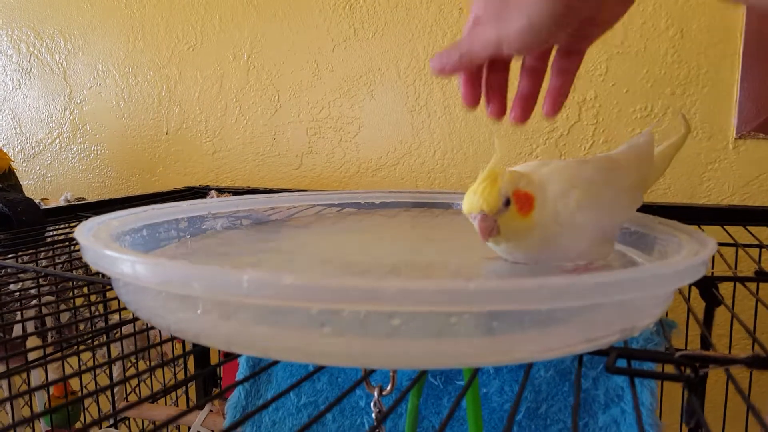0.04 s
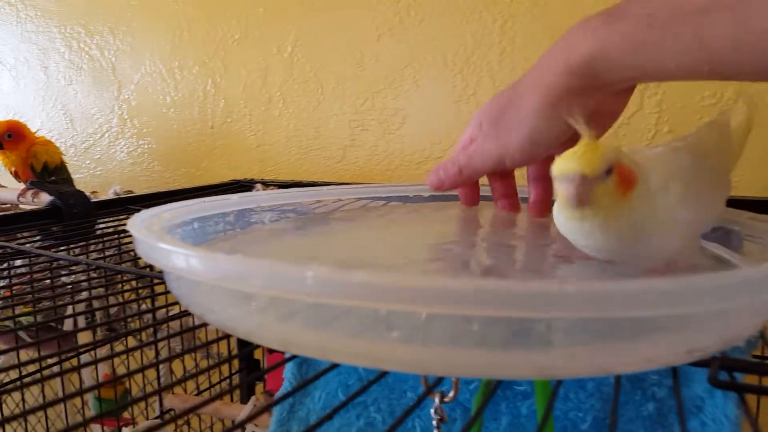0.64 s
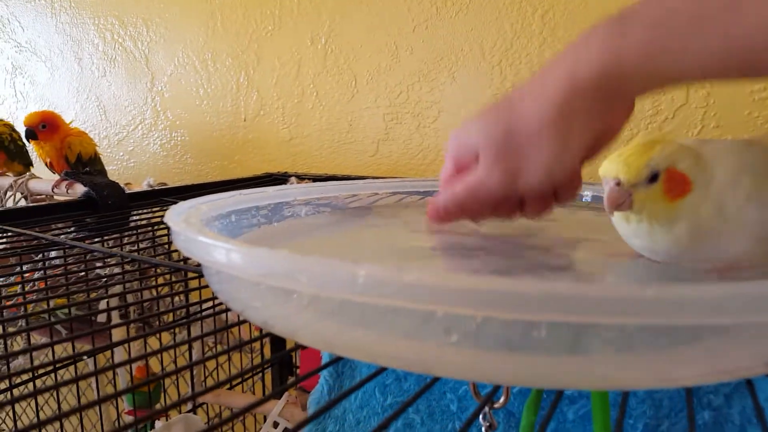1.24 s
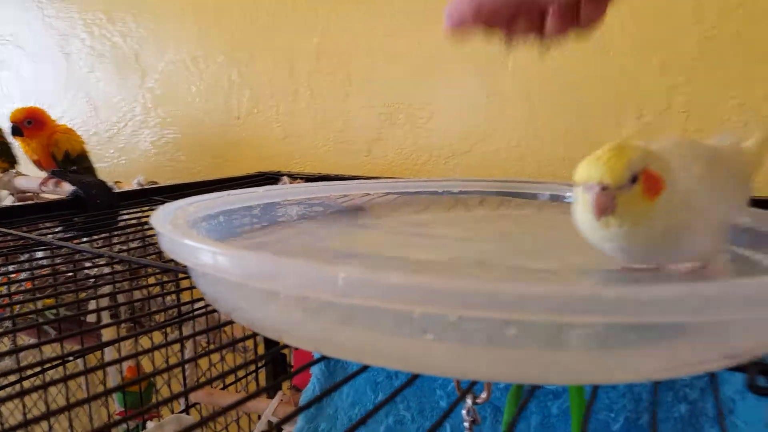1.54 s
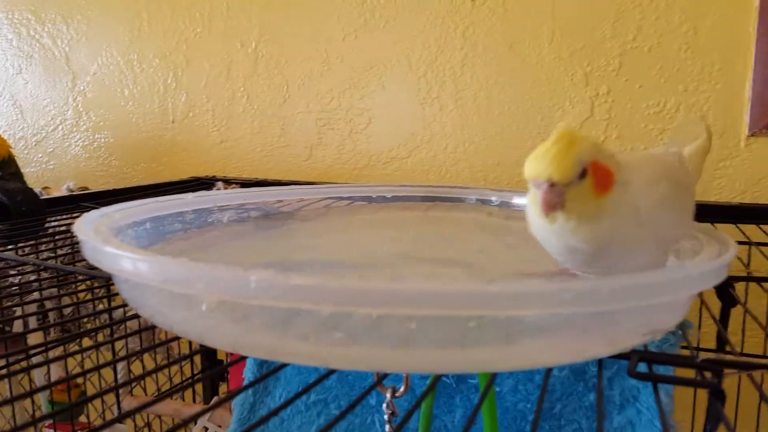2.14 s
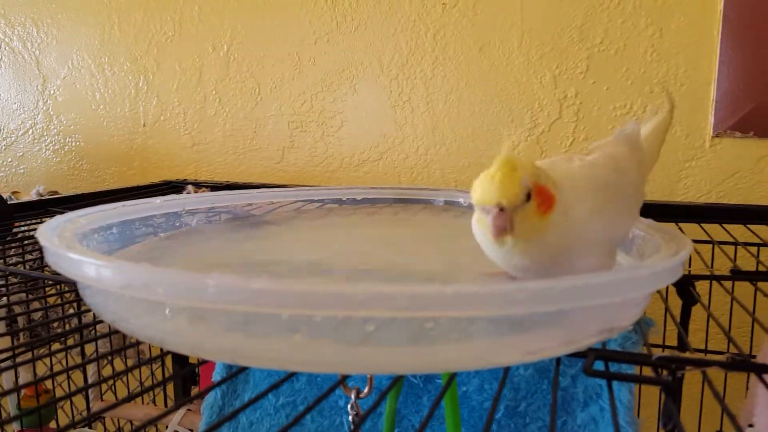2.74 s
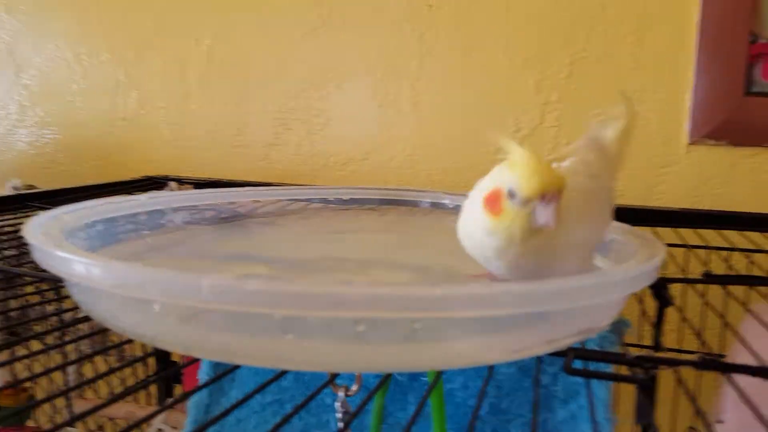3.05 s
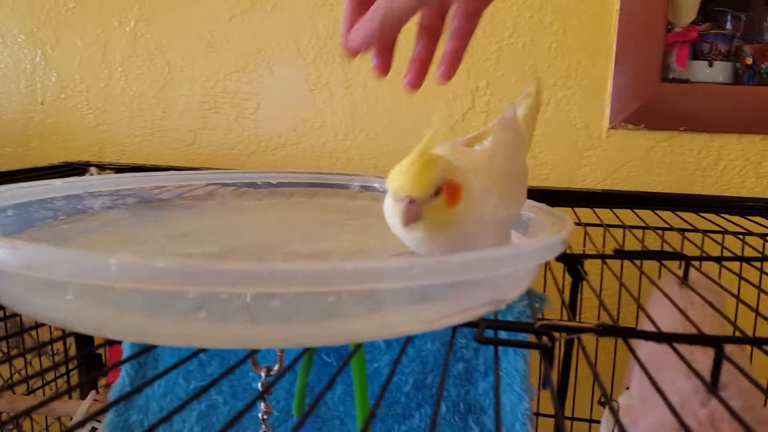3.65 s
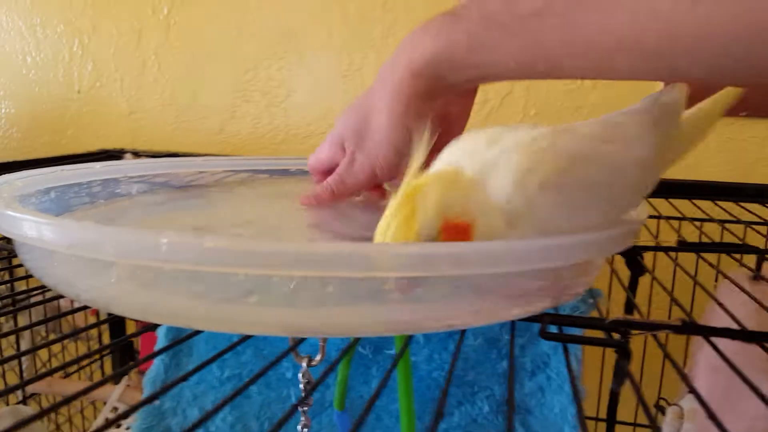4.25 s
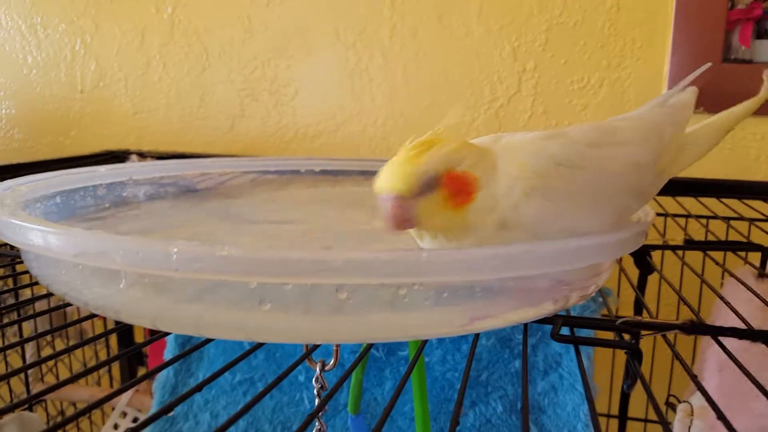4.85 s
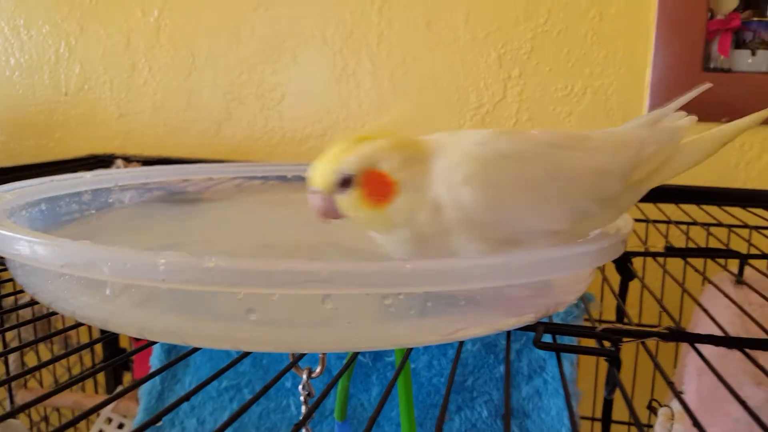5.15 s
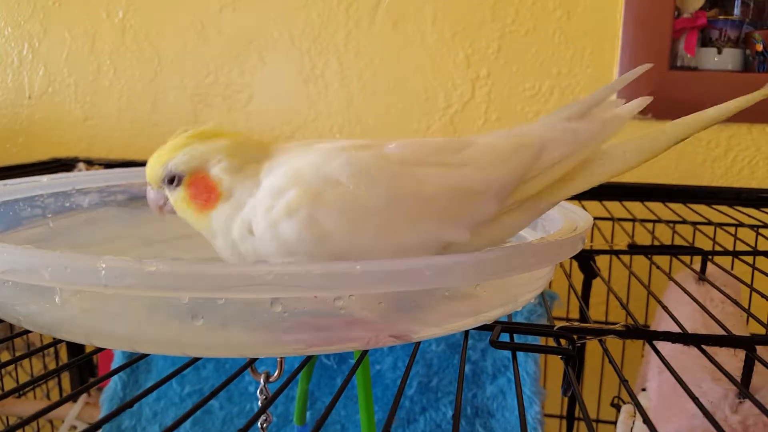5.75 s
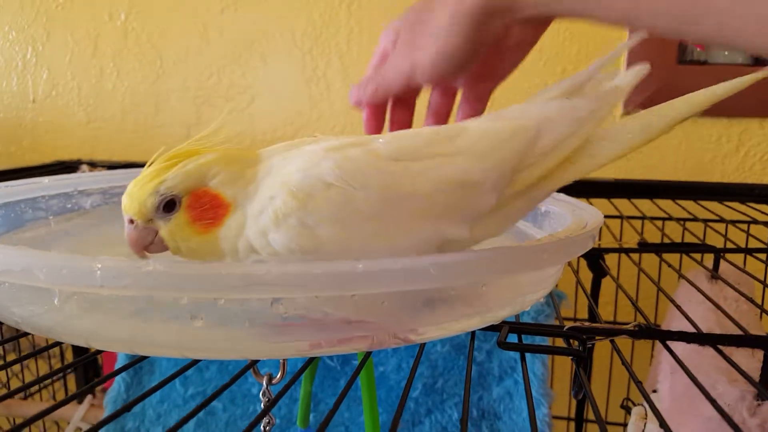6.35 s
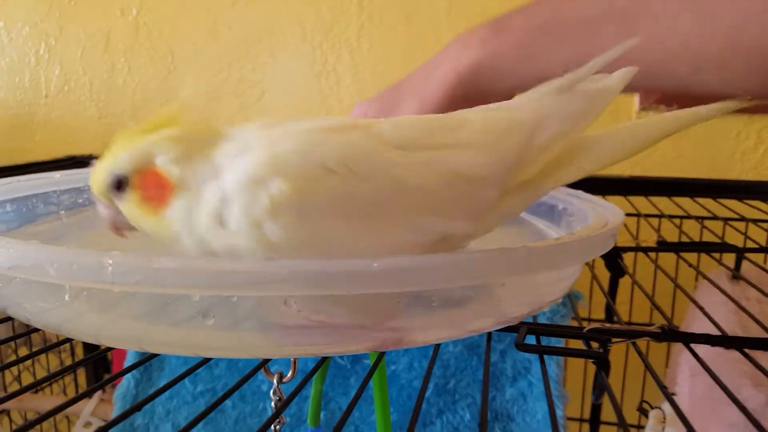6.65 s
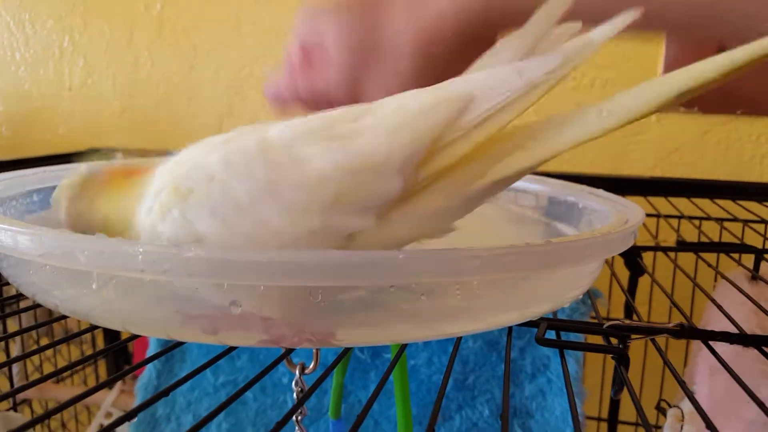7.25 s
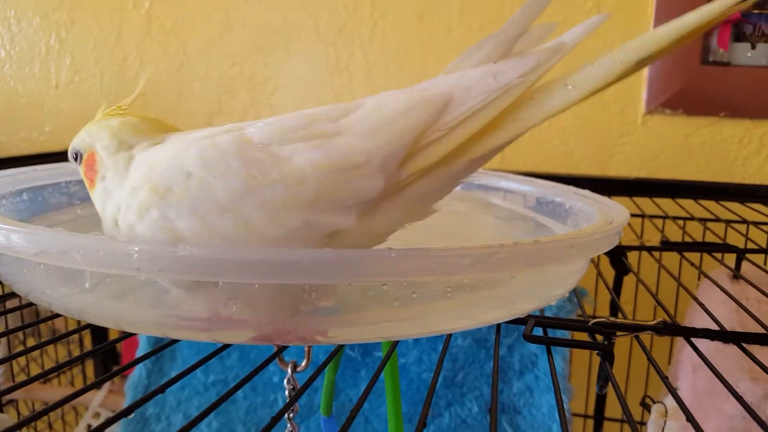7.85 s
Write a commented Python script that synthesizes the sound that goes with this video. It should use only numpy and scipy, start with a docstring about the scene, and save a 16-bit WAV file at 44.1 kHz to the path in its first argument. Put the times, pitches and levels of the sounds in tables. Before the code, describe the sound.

Three pairs of loud rising and falling cockatiel whistles echo indoors, over small water drops and a faint distant thump.

```python
"""A cockatiel in a plastic dish of water gives three pairs of loud, arched whistles in a bare, ringing room.
Its syrinx scoops up, arches and droops, rasping at the low ends; throat and beak colour the overtones.
Drops, small taps and tiny bubbles sound from the dish as the bird and a hand move in the water.
Something thumps elsewhere in the house, and two soft low puffs sit under the first two whistles.
Room air and a faint appliance hum lie beneath it all."""
import sys
import numpy as np
from scipy import signal
from scipy.fft import rfft, irfft
from scipy.io import wavfile
from scipy.ndimage import uniform_filter1d

SR = 44100
rng = np.random.default_rng(int(sys.argv[2]) if len(sys.argv) > 2 else 0)


def unload_wav(signal):
    """Save mono or channel-first audio to the path in sys.argv[1] as 16-bit WAV at rate SR, clipped to [-1, 1]."""
    wavfile.write(
        sys.argv[1],
        SR,
        np.round(np.clip(np.atleast_2d(signal).T, -1, 1) * 32767).astype(np.int16),
    )


N = 352932
CEILING_HZ = 16150


def amp(db):
    """Decibels to gain."""
    return 10 ** (np.asarray(db) / 20)


def unit_rms(x):
    """Scales to an rms of one."""
    return x / np.sqrt(np.mean(x ** 2) + 1e-20)


def curve(points, hz):
    """Reads a table of (frequency [Hz], value) on a log-frequency axis."""
    f, value = np.transpose(points)
    return np.interp(np.log(hz + 1), np.log(f + 1), value)


def add(mix, start_s, sound):
    """Lays a sound into the mix at its start time."""
    part = mix[:, round(start_s * SR):][:, :sound.shape[1]]
    part += sound[:, :part.shape[1]]


def wander(size, rate_hz):
    """Smooth random modulation of rms one, rolled off above the given rate."""
    hz = np.fft.rfftfreq(size, 1 / SR)
    return unit_rms(irfft(rfft(rng.standard_normal(size)) / (1 + (hz / rate_hz) ** 4), size))


def diffuse(colour, size):
    """Coloured stereo noise, narrow in the low mids and wide in the treble."""
    # likeness of left and right in a diffuse field: (frequency [Hz], correlation)
    coherence = [(60, 0.41), (250, 0.92), (600, .55), (1200, .1), (16000, .05)]
    hz = np.fft.rfftfreq(size, 1 / SR)
    left, other = rfft(rng.standard_normal((2, size)))
    alike = curve(coherence, hz)
    right = alike * left + np.sqrt(1 - alike ** 2) * other
    return unit_rms(irfft(np.array([left, right]) * amp(curve(colour, hz)), size))


def room(x, predelay_s=0.0044, early_db=-4, early_s=0.0083):
    """Close echoes from dish and wall, then a dense tail whose treble dies first."""
    # ring of the bare room: (frequency [Hz], t60 [s])
    decay = [(100, 0.95), (500, .75), (2200, .8), (5000, 0.79), (8000, 0.63), (11000, 0.59), (16000, 0.19)]
    t = np.arange(SR) / SR
    hz, age, noise = signal.stft(rng.standard_normal((2, SR)), SR, nperseg=256)
    fade = amp(-60 * age / curve(decay, hz)[:, None])
    tail = signal.istft(noise * fade, SR, nperseg=256)[1][:, :SR]
    tail = unit_rms(tail * np.clip(t / predelay_s - 1, 0, 1))
    echoes = rng.choice([-1., 1.], (2, SR)) * (rng.random((2, SR)) < 1500 / SR)
    early = unit_rms(echoes * np.exp(-t / early_s) * (t > .001))
    return signal.fftconvolve(x[None], (tail + amp(early_db) * early) / np.sqrt(SR), axes=1)[:, :N]


def room_tone(air_db=-62, waver_rad=0.45, hum_trim_db=-1):
    """A bed of quiet air under the wavering hum of an appliance."""
    # colour of the room air: (frequency [Hz], relative level [dB])
    air_colour = [(20, -25.5), (35, -19.5), (55, -11.5), (110, -12.5), (200, -15), (263, -11), (330, -18.5),
                  (450, -18), (680, -23), (1300, -30.5), (2000, -30), (4400, -36), (7100, -44),
                  (14000, -38.5), (16000, -43.5)]
    # tones of the appliance: (frequency [Hz], level before trim [dB])
    hum_tones = [(150.7, -76), (209.9, -73.5), (253.0, -72.5), (457.6, -78), (1561, -80)]
    t = np.arange(N) / SR
    hum = sum(amp(db) * np.sqrt(2) * np.sin(2 * np.pi * hz * t + waver_rad * wander(N, 4.3))
              for hz, db in hum_tones)
    return amp(air_db) * diffuse(air_colour, N) + amp(hum_trim_db) * hum


def thumps_and_puffs(attack_s=0.0085):
    """Distant thumps and two soft low puffs, each a dull wash of noise that swells and dies."""
    # distant thumps, plus the puffs under the first two whistles: (time [s], level [dB], t60 [s])
    bursts = [(0.129, -33.5, 0.98), (.355, -41, 0.75), (1.224, -49, 0.39), (1.405, -43, 0.27),
              (3.211, -50.5, 0.68), (3.603, -46.5, 0.47), (3.675, -52.5, 0.37), (6.76, -56.5, 0.53)]
    # their dull colour: (frequency [Hz], relative level [dB])
    dull_colour = [(30, -32), (60, -9), (90, -0.5), (130, -5), (240, -6.5), (330, -8), (425, -4),
                   (560, -13.5), (900, -14), (1500, -19.5), (2800, -26.5), (4500, -39), (9000, -44),
                   (16000, -48)]
    out, t = np.zeros((2, N)), np.arange(SR) / SR
    for start_s, db, t60 in bursts:
        envelope = np.minimum(t / attack_s, 1) * amp(db - 60 * t / t60)
        add(out, start_s, diffuse(dull_colour, SR) * envelope)
    return out


def stirred_water(bubbles_per_s=260, scatter_db=4, pitches=24, room_db=-9):
    """Many tiny bubbles burst while feathers and fingers stir the dish."""
    # swells of stirring: (centre time [s], half width [s], level [dB])
    swells = [(4.301, 0.31, -73.5), (5.12, 0.093, -70.5), (5.529, 0.15, -64.5), (6.841, 0.16, -59.5),
              (7.406, .14, -64), (7.808, 0.16, -68.5)]
    t, age = np.arange(N) / SR, np.arange(600) / SR
    stir = sum(amp(db) * np.exp(-((t - centre) / half) ** 2) for centre, half, db in swells)
    fizz = np.zeros((2, N))
    for hz in np.geomspace(1000, 13000, pitches):
        bubble = np.sin(2 * np.pi * hz * age) * np.exp(-age * hz / 2)
        pops = np.zeros((2, N))
        for channel in pops:
            at = rng.integers(0, N, int(bubbles_per_s * N / SR / pitches))
            channel[at] = amp(scatter_db * np.minimum(rng.exponential(1, len(at)), 3))
        fizz += signal.oaconvolve(pops, bubble[None], axes=1)[:, :N]
    water = stir * unit_rms(fizz)
    return water + amp(room_db) * room(water[0])


def drops(pitch_rise=0.074, tick_s=0.0024, spread=0.47, room_db=-9):
    """Each drop is a tick and a short, slightly rising ring, broken up by the moving water."""
    # drops and taps at the dish: (time [s], level [dB], starting pitch [Hz], t60 [s], tick vs ring [dB])
    hits = [(1.087, -42.5, 1310, 0.02, -11), (1.909, -21.5, 1533, 0.023, -25.5),
            (1.963, -37, 8920, 0.008, 5.5), (2.35, -55.5, 11580, .008, 7), (4.136, -48, 2520, 0.014, 4),
            (4.192, -54, 2660, .028, -13), (4.374, -51, 2745, .03, -17), (4.458, -46, 5400, .02, -12),
            (4.664, -50.5, 6100, 0.025, -9.5), (5.032, -53, 5000, .013, -4), (5.097, -47, 5910, .02, 10.5),
            (5.240, -45, 10840, 0.01, 1), (5.254, -42, 2450, 0.018, -20), (5.434, -48, 3890, 0.022, 0),
            (5.475, -39, 1047, 0.032, -13), (5.609, -40, 1018, 0.043, -9), (5.698, -49.5, 9900, .006, 16),
            (6.876, -39.5, 1873, 0.023, -4), (7.327, -53, 3250, 0.043, 14),
            (7.415, -36.5, 2624, 0.017, -14), (7.424, -32, 1870, .015, -3.5), (7.428, -38, 4370, 0.016, 2),
            (7.500, -41, 1860, 0.02, 8), (7.503, -32, 1074, 0.025, -14), (7.533, -35.5, 3930, 0.0085, -12),
            (7.644, -46, 3305, 0.024, -9.5), (7.731, -52, 5320, 0.023, -1), (7.958, -46.5, 1187, 0.021, -7)]
    out, t = np.zeros((2, N)), np.arange(SR // 10) / SR
    for start_s, db, hz, t60, tick_db in hits:
        phase = 2 * np.pi * np.cumsum(hz * (1 + pitch_rise * np.minimum(t / t60, 1))) / SR
        splash = np.array([wander(len(t), spread * hz) * np.sin(phase)
                           + wander(len(t), spread * hz) * np.cos(phase) for _ in "LR"])
        envelope = (1 - np.exp(-t * hz)) * amp(-60 * t / t60)
        ring = .5 * (np.sin(phase) + splash) * envelope
        tick = .5 * amp(tick_db) * rng.standard_normal((2, len(t))) * np.exp(-t / tick_s)
        add(out, start_s, amp(db) * (ring + tick))
    return out + amp(room_db) * room(out[0])


def pan(left_db, hz):
    """Left and right gains that set the bird's fundamental to one side and its treble near the centre."""
    # spread of the bird's image: (frequency [Hz], share of the left-right level difference)
    sidedness = [(1500, 1), (2700, 1), (5000, .3), (8000, -.2), (14000, .15)]
    return amp(np.outer([.5, -.5], left_db * curve(sidedness, hz)))


def near_field(x, left_db, right_lag_s=14 / SR, glance_db=-5, glance_s=0.0023):
    """The whistle reaches the left side first, blurred by glances off the water and the dish."""
    size = len(x) + SR // 25
    hz, t = np.fft.rfftfreq(size, 1 / SR), np.arange(size) / SR
    echoes = rng.standard_normal((2, size)) * (rng.random((2, size)) < 3000 / SR) * np.exp(-t / glance_s)
    glances = rfft(echoes / (np.linalg.norm(echoes, axis=1, keepdims=True) + 1e-9))
    straight = np.exp(-2j * np.pi * np.outer([0, right_lag_s], hz))
    return irfft(rfft(x, size) * pan(left_db, hz) * (straight + amp(glance_db) * glances), size)


def breath(t, length, top_s, open_hz, top_hz, close_hz, rise_s, fall_s, effort_db, overtone_db, dip_db,
           scoop_depth=.406, scoop_s=.0056, droop_depth=.316, droop_s=.0228, attack_s=.015):
    """One breath of song: a scoop, a bell-shaped arch and a droop, as pitch, effort and brightness."""
    rising = t < top_s
    arch = np.exp(-((t - top_s) / np.where(rising, rise_s, fall_s)) ** 2)
    scoop = np.exp(-t / scoop_s)
    droop = np.clip(1 - (length - t) / droop_s, 0, 1) ** 1.5
    shoulder_hz = np.where(rising, open_hz, close_hz)
    arch_hz = shoulder_hz + (top_hz - shoulder_hz) * arch
    hz = arch_hz * (1 - scoop_depth * scoop) * (1 - droop_depth * droop)
    soft_onset = np.exp(-(t / attack_s) ** 2)
    level_db = effort_db - 11 * soft_onset - .5 * arch - 3.5 * droop
    pure = np.exp(-((t - .038) / .012) ** 2)  # most whistles turn purer just after the scoop
    # overtones grow at the top, where the pitch is slack, and further in the droop
    bright_db = overtone_db + dip_db * pure + arch + 5.5 * np.sqrt(scoop + droop) + 2.5 * droop
    return hz, level_db, bright_db


def whistle(length, shape, beak_hz, jitter=.005, slack_jitter=.028, steady_hz=2080,
            beak_db=11, beak_width_hz=400, rasp_db=-24, slack_rasp_db=-11,
            tilt_db_per_octave=-2, subharmonic_db=-14, close_s=0.0047):
    """The gliding syrinx rasps at the low ends; overtones flare as they cross the beak resonance."""
    # response of the throat: (frequency [Hz], gain [dB])
    throat = [(600, -26.5), (1200, -9.5), (1700, -5), (2100, 0), (2700, -2.5), (3400, -6), (4300, -2.5),
              (5300, -0.5), (6100, -13), (7800, -12), (9300, -12.5), (11000, -16), (13000, -16.5),
              (15500, -34)]
    t = np.arange(0, length, 1 / SR)
    hz, effort_db, bright_db = breath(t, length, *shape)
    slack = np.clip((steady_hz - hz) / 400, 0, 1)  # slack membranes beat unevenly
    hz = hz * (1 + (jitter + slack_jitter * slack) * wander(len(t), 440))
    phase = 2 * np.pi * np.cumsum(hz) / SR
    k = np.arange(1, 9)[:, None]  # harmonic numbers
    source_db = effort_db + tilt_db_per_octave * np.log2(k) + bright_db * (k > 1)
    colour_db = curve(throat, k * hz) + beak_db / (1 + ((k * hz - beak_hz) / beak_width_hz) ** 2)
    partials = amp(source_db + colour_db) * (k * hz < CEILING_HZ)
    turbulence = np.array([wander(len(t), 700) for _ in k])
    flutter = (amp(rasp_db) + amp(slack_rasp_db) * slack) * np.sqrt(k) * turbulence
    # the overtones die first as the pressure runs out
    closing = np.clip((t[-1] - t) / close_s, 0, 1) ** (k / 4)
    voice = (partials * closing * (1 + flutter) * np.sin(k * phase)).sum(0)
    # strong and weak beats alternate, adding the octave below
    voice += amp(effort_db + subharmonic_db + curve(throat, hz / 2)) * slack * np.sin(phase / 2)
    return voice * signal.windows.tukey(len(t), .025)


def cockatiel(direct_db=-2.5, room_db=-5.0, hiss_db=-40, room_left_db=2.0):
    """Each whistle, with a trace of air noise, arrives from left of centre and fills the room."""
    # the bird's whistles: (start [s], length [s], time to the top [s], opening shoulder [Hz], top [Hz],
    # closing shoulder [Hz], rise width [s], fall width [s], effort [dB], overtone trim [dB],
    # overtone change after the scoop [dB], beak resonance [Hz], pan left [dB], room send [dB])
    song = [(1.106, 0.17, 0.1, 1696, 2592, 1795, .1, 0.051, -12, 0, 1.5, 8030, 6, 1),
            (1.399, 0.22, 0.11, 1930, 2720, 2087, 0.057, 0.054, -11.5, -0.5, -8.5, 7580, 7, 0.5),
            (2.493, 0.24, 0.12, 1389, 2641, 2070, 0.1, 0.059, -13, 1, -19, 7400, 8, 0.5),
            (2.852, 0.24, 0.096, 1747, 2735, 1971, 0.054, 0.085, -12, 1, -10, 7660, 6.5, -0.5),
            (5.715, .247, .12, 1703, 2733, 2166, .107, .053, -12, 0.5, -5, 7640, 5.5, 0),
            (6.096, 0.23, 0.11, 1684, 2756, 2115, 0.083, 0.06, -12.5, 1.5, -2, 8240, 6, 1)]
    direct, send = np.zeros((2, N)), np.zeros((1, N))
    for start_s, length, *shape, beak_hz, left_db, send_db in song:
        voice = whistle(length, shape, beak_hz)
        envelope = np.sqrt(abs(uniform_filter1d(voice ** 2, size=200)))
        voice += amp(hiss_db) * envelope * wander(len(voice), 2700)
        add(direct, start_s, near_field(voice, left_db))
        add(send, start_s, amp(send_db) * voice[None])
    reverb = irfft(rfft(room(send[0])) * pan(room_left_db, np.fft.rfftfreq(N, 1 / SR)), N)
    return amp(direct_db) * direct + amp(room_db) * reverb


def scene():
    """The bird up front, over water, thumps, puffs and room tone."""
    return cockatiel() + drops() + stirred_water() + thumps_and_puffs() + room_tone()


def record(dry):
    """A steep low-pass takes the very top off the mix."""
    lowpass = signal.firwin(511, CEILING_HZ, window=("kaiser", 9), fs=SR)
    return signal.oaconvolve(dry, lowpass[None], "same")


dry = scene()
out = record(dry)
unload_wav(out)
```